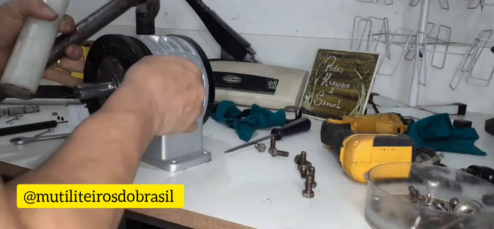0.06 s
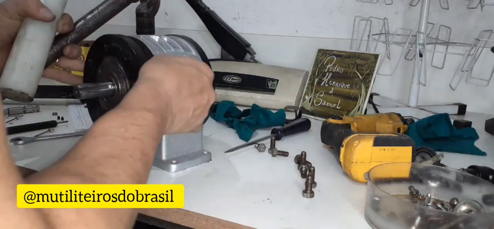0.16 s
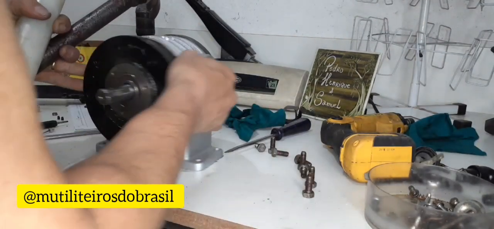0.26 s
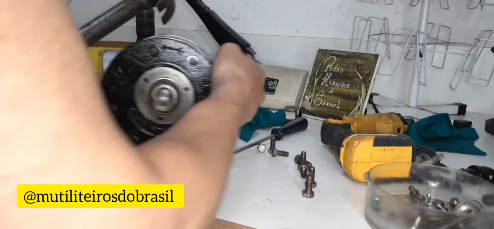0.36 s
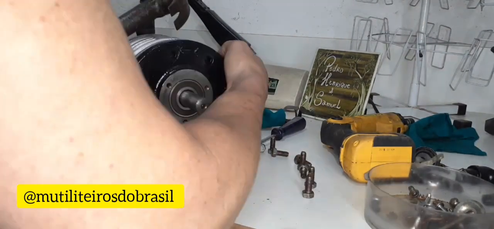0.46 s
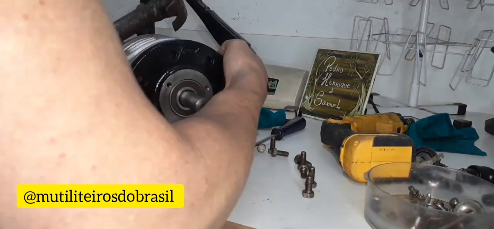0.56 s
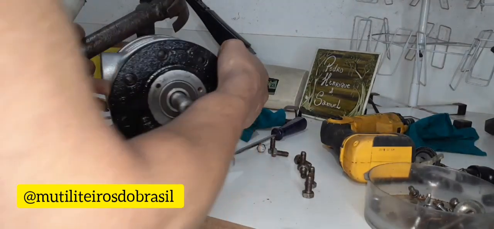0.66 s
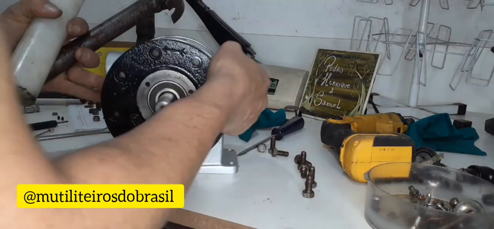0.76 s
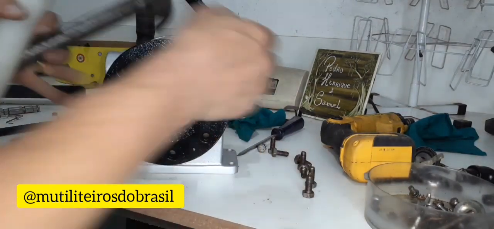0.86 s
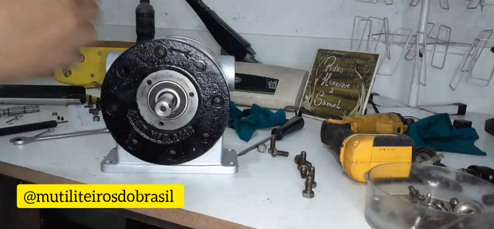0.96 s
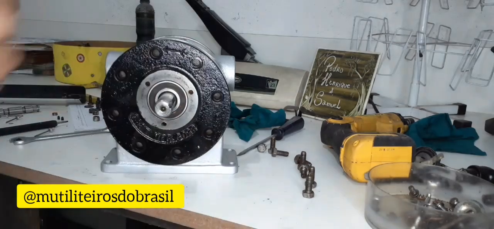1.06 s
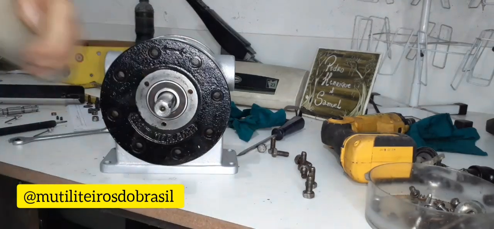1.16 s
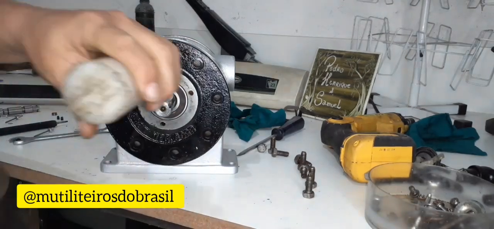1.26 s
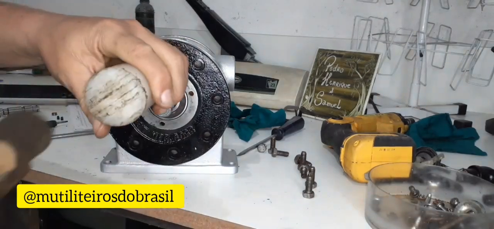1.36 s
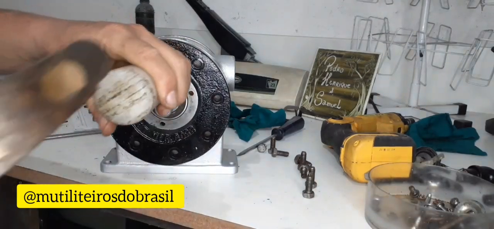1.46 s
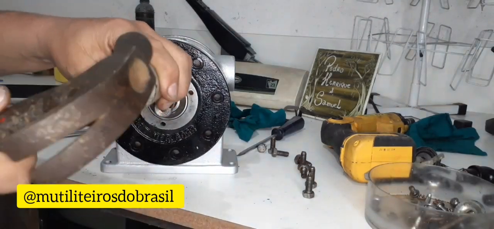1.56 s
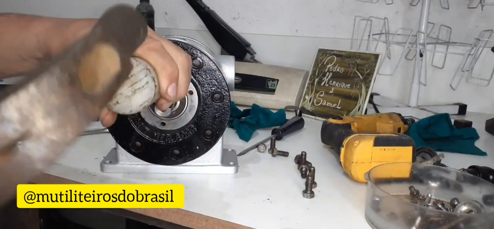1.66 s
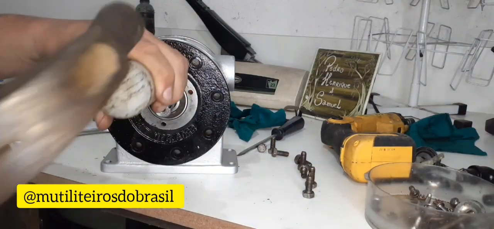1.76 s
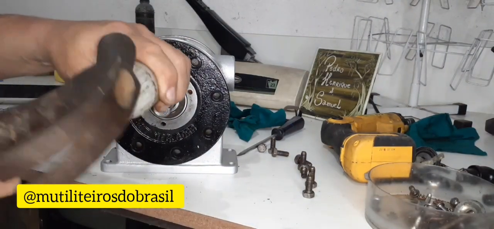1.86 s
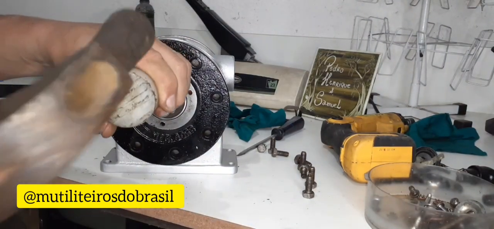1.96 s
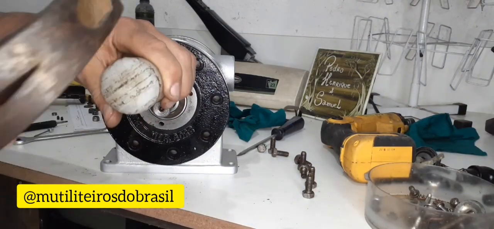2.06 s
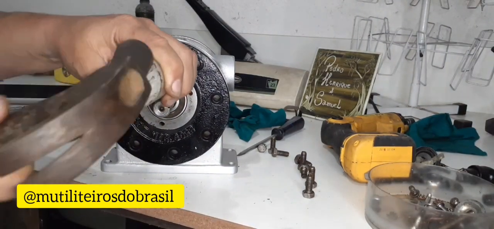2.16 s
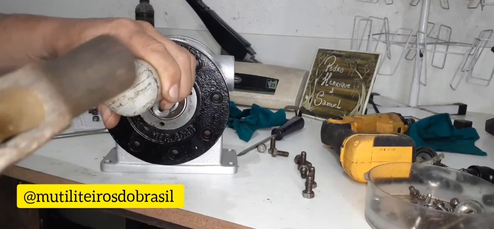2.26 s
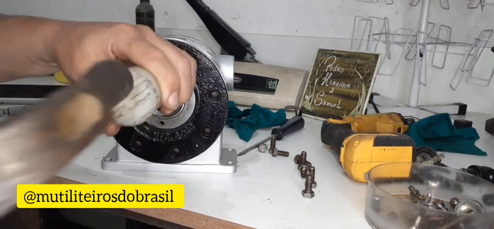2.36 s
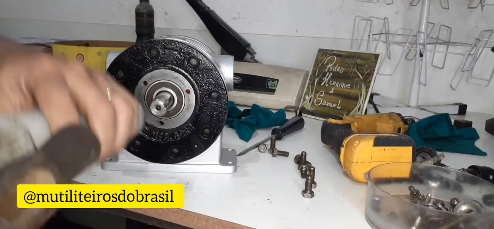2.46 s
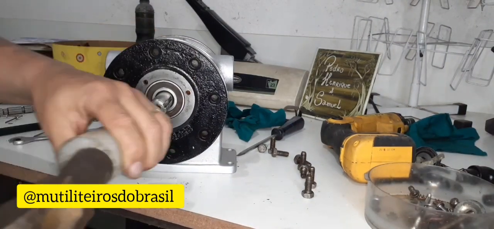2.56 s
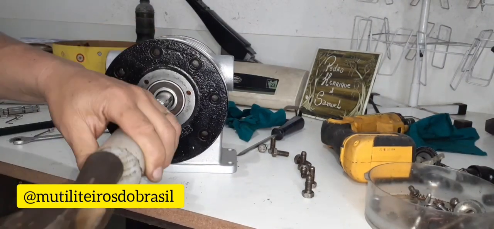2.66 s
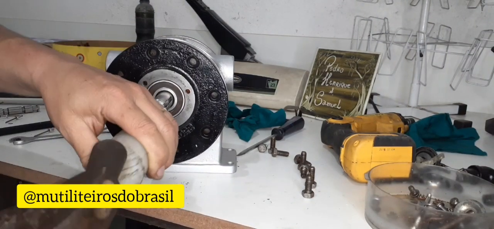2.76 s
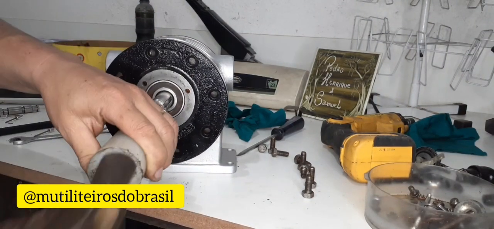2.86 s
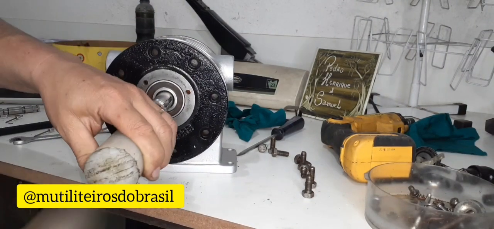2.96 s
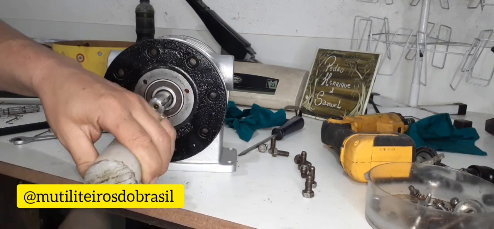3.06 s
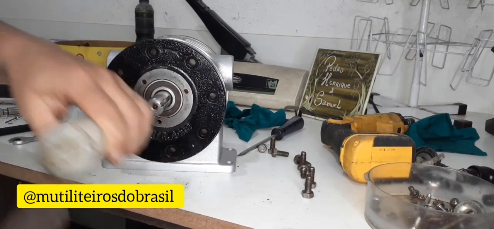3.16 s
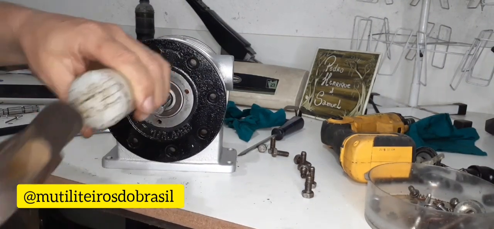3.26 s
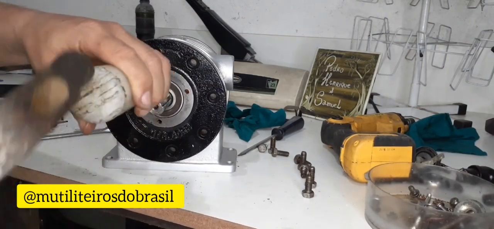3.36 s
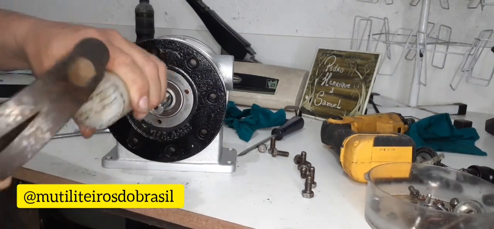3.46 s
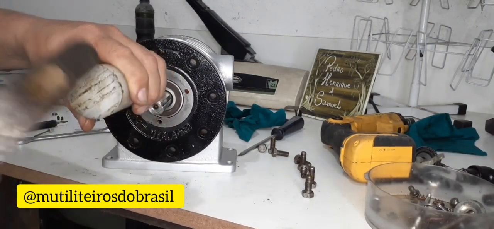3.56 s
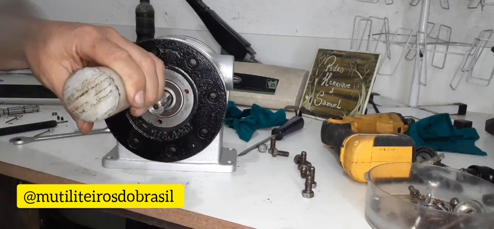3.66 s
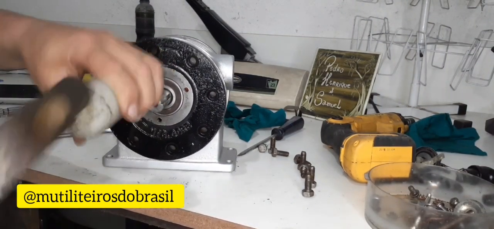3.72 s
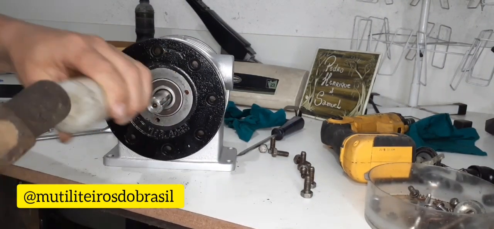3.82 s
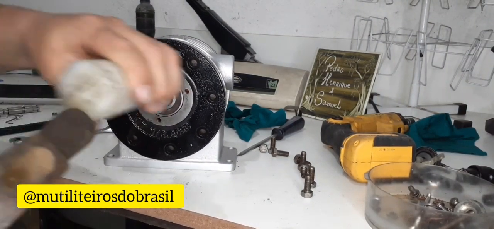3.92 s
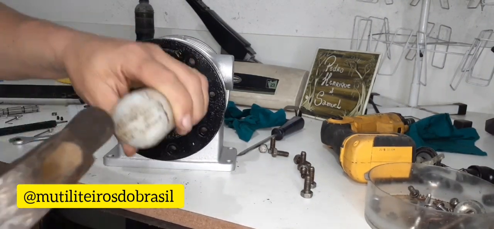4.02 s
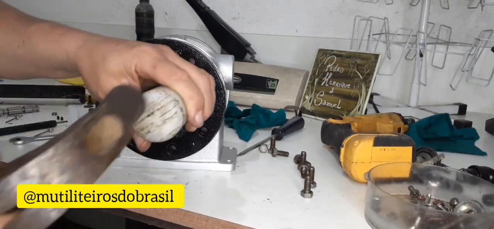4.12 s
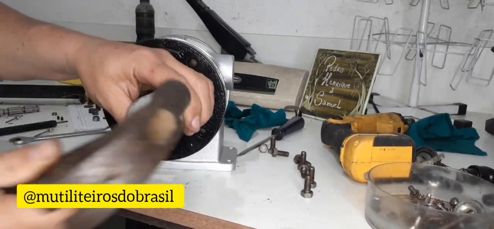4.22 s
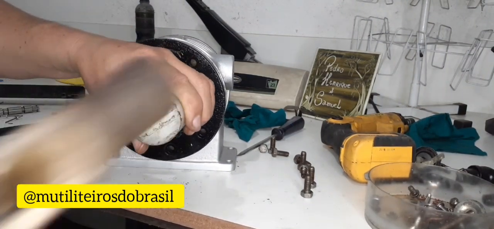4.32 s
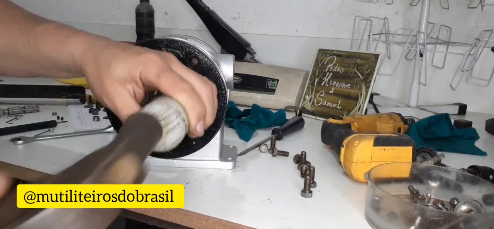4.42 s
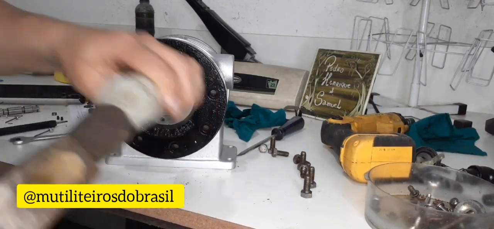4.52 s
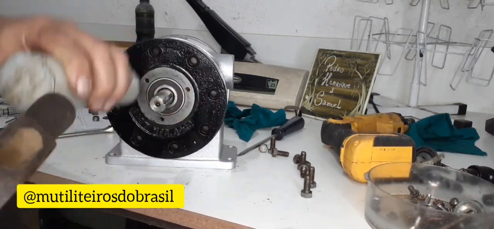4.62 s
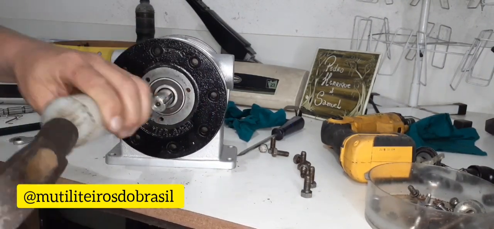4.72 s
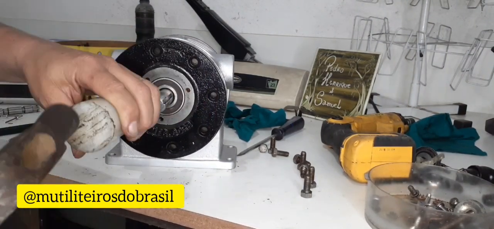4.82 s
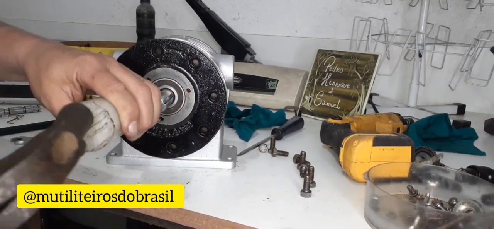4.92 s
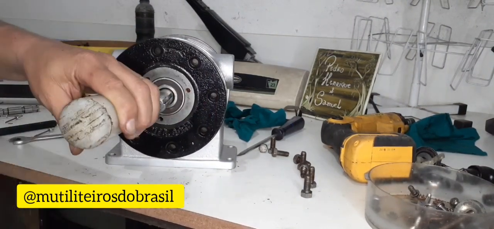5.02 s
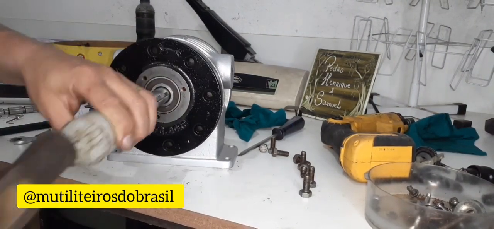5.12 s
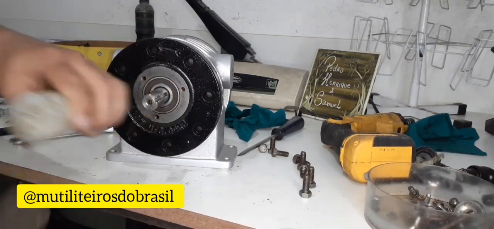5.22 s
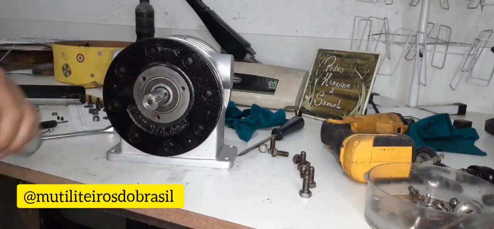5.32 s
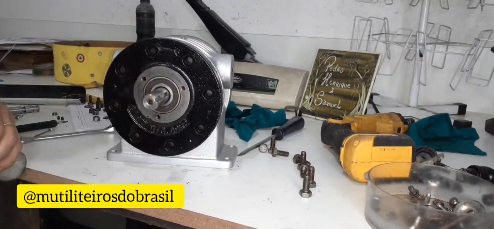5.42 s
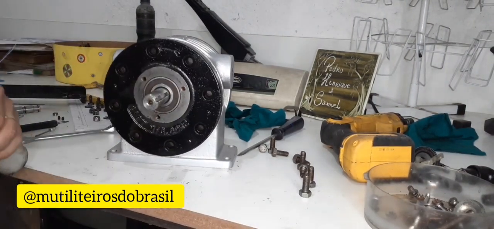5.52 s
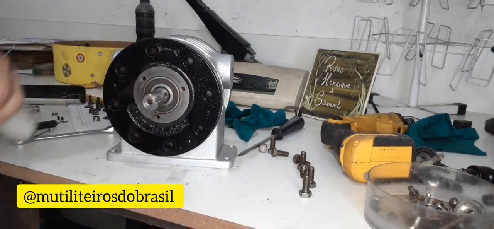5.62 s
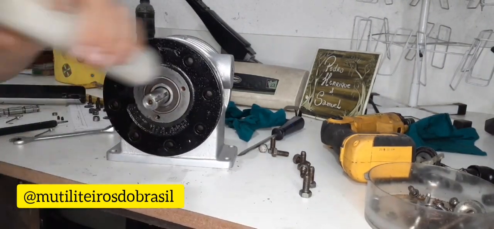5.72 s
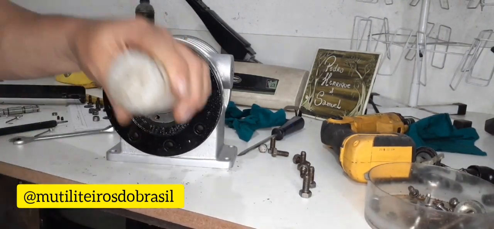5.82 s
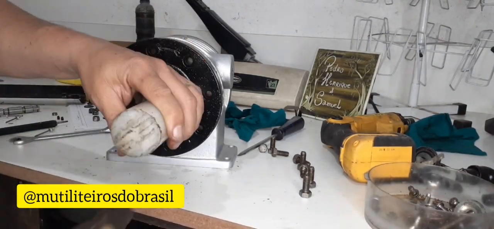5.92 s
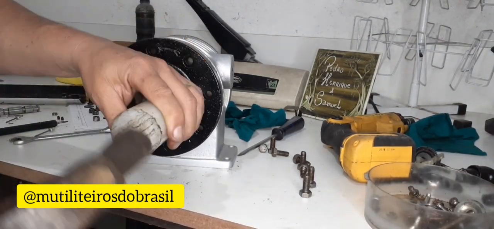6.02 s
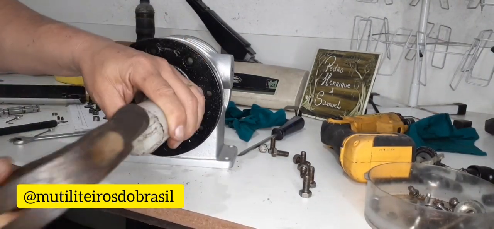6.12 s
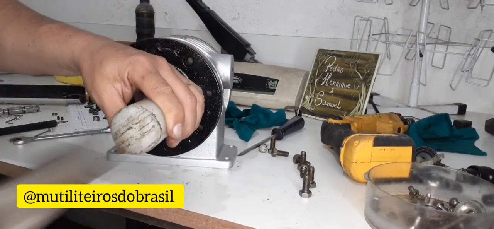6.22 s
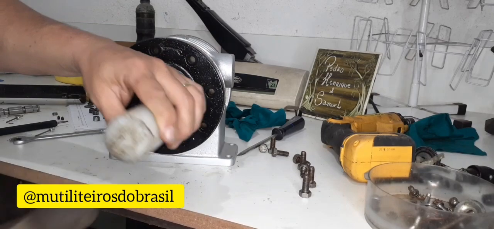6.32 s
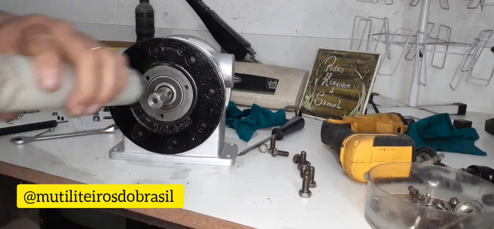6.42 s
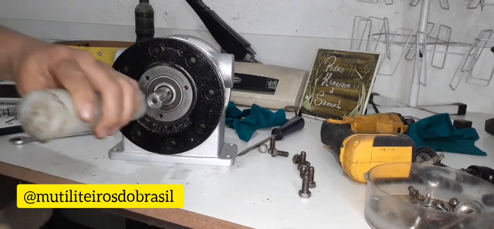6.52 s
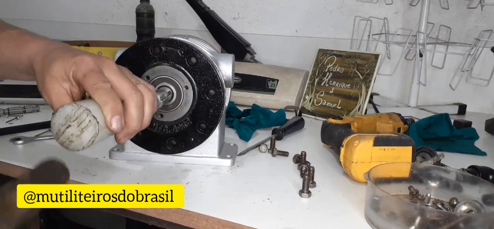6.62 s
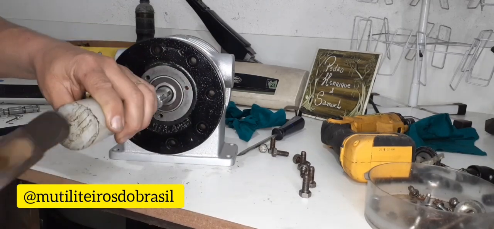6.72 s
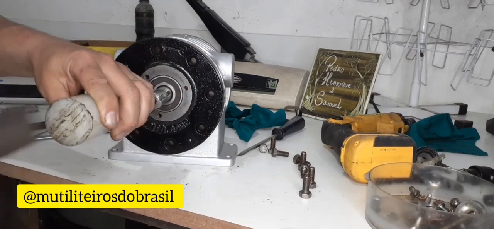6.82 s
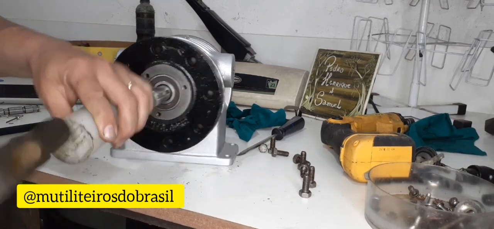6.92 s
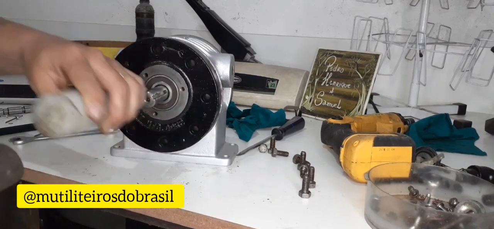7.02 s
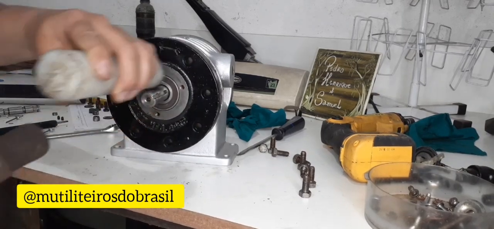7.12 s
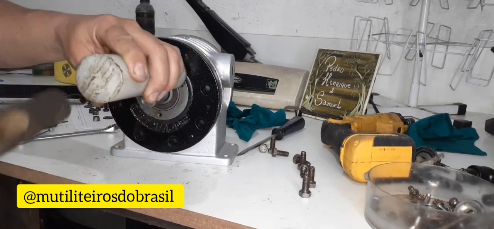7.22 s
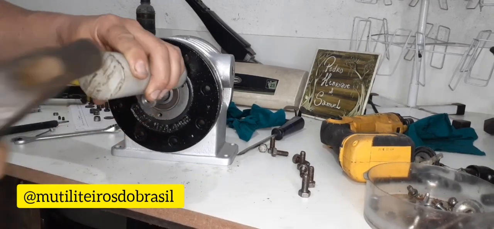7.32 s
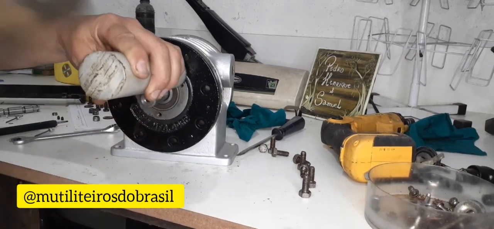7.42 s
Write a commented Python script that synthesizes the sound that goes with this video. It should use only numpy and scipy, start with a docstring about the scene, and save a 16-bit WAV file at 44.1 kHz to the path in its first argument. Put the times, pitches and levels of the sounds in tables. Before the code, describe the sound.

After a short scrape, uneven hammer taps and sharp blows drive a metal cover home, thudding through a bench in a small workshop.

```python
"""A hammer drives the metal end cover of a motor housing home through a plastic drift, on a workbench.
First the housing is dragged round, a hand brushes over it and a tool clinks. Then light aiming taps
alternate with hard blows; each cracks, rings the cover, thuds through the bench and shakes loose screws.
Two microphones stand close to the bench in a small, hard-walled workshop with a faint low drone."""
import sys
import numpy as np
from scipy import signal
from scipy.fft import rfft, irfft
from scipy.io import wavfile

SR = 44100
rng = np.random.default_rng(int(sys.argv[2]) if len(sys.argv) > 2 else 0)


def digitize_waveform(pressure):
    """Quantize a signal to 16-bit integers and store it at the path in sys.argv[1].

    Rows of a 2-D input are taken as channels; values are limited to [-1, 1].
    """
    field = np.atleast_2d(pressure).T
    bounded = np.clip(field, -1, 1)
    quanta = np.round(bounded * 32767).astype(np.int16)
    wavfile.write(sys.argv[1], SR, quanta)


N = 329868
SIZE, LEAD = 32768, 2048  # samples in one blow, and how many of them come before the contact
HZ = np.fft.rfftfreq(SIZE, 1 / SR)
T = (np.arange(SIZE) - LEAD) / SR  # seconds since the contact
USUAL_DB = -30  # body level of a usual blow; force is counted in dB above it


def gain_of(db):
    """Decibels to amplitude."""
    return 10 ** (np.asarray(db) / 20)


def unit_rms(x):
    """Scales to rms 1."""
    return x / np.sqrt(np.mean(x ** 2) + 1e-20)


def curve(points, hz=HZ):
    """Joins table rows by straight lines on a log-frequency axis."""
    row_hz, value = np.transpose(points)
    return np.interp(np.log(hz + 1), np.log(row_hz + 1), value)


def peak(hz, width_hz):
    """Bell of a resonance, 1 at its centre."""
    return 1 / (1 + (2 * (HZ - hz) / width_hz) ** 2)


def levelled(colour):
    """Refers a colour in dB to the power of its middle band."""
    middle = (HZ > 500) & (HZ < 2500)
    return colour - 10 * np.log10(np.mean(gain_of(colour) ** 2 * middle))


def coloured(x, db):
    """Filters x by a gain curve in dB, at minimum phase so that its peaks ring after the blow."""
    log_gain = np.log(gain_of(np.maximum(db, -100)))
    mirrored = np.r_[log_gain, log_gain[-2:0:-1]]
    response = np.exp(np.conj(signal.hilbert(mirrored)))[:len(HZ)]
    return signal.fftconvolve(x, irfft(response)[None, :SIZE // 2], axes=1)[:, :x.shape[1]]


def resonating(x, hz, width_hz):
    """One resonance driven by x, at rms 1."""
    return unit_rms(coloured(x, 20 * np.log10(peak(hz, width_hz))))


def paired(x):
    """Makes two unrelated channels alike in the bass, as at two close microphones."""
    # Each row: frequency in Hz, correlation of left and right.
    likeness = [(30, .35), (80, .88), (200, .9), (330, .8), (550, .5), (1000, .02), (3000, -.1), (16000, 0)]
    a, b = rfft(x)
    same = curve(likeness, np.fft.rfftfreq(x.shape[1], 1 / SR))
    mid, side = a * np.sqrt((1 + same) / 2), b * np.sqrt((1 - same) / 2)
    return irfft([mid + side, mid - side], x.shape[1])


def grains(size, per_s, spread_db):
    """Two channels of random clicks of uneven strength."""
    strength = gain_of(spread_db * np.minimum(rng.exponential(1, (2, size)), 4))
    return unit_rms(strength * rng.choice([-1, 1], (2, size)) * (rng.random((2, size)) < per_s / SR))


def wander(step_s):
    """Random drift that takes a new value every step_s seconds."""
    return np.interp(np.arange(N) / SR / step_s, np.arange(2048), rng.standard_normal(2048))


def arch(start, length, late):
    """Rises from 0 to 1 and falls back; the greater late is, the later the top."""
    progress = np.clip((np.arange(N) / SR - start) / length, 0, 1)
    return np.abs(np.sin(np.pi * progress ** late))


def rise(swell):
    """Onset that swells over the given seconds up to the contact."""
    return np.clip(1 + T / max(swell, 1e-4), 0, 1) ** 2


def lingering(level, db_per_s):
    """Lets a level fall no faster than bench and room die away."""
    fall = np.arange(N) / SR * db_per_s
    return gain_of(np.maximum.accumulate(20 * np.log10(level + 1e-9) + fall) - fall)


def add(mix, s, sound):
    """Mixes in a stereo sound whose contact falls at s seconds."""
    part = mix[:, round(s * SR) - LEAD:][:, :SIZE]
    part += sound[:, :part.shape[1]]


def room_tone(drone_db=-77.5, waver_db=2.5, hiss_db=-91.5):
    """The quiet workshop: a low drone that slowly wavers, and microphone hiss."""
    # Each row: frequency in Hz, the drone's spectral density in dB.
    spectrum = [(20, -14.5), (60, -9.5), (105, -3), (150, -10), (188, -1.5), (250, -11.5), (450, -17.5),
                (900, -26), (2000, -35), (6500, -50.5), (15000, -43)]
    drone = unit_rms(coloured(paired(rng.standard_normal((2, N))), curve(spectrum)))
    level = gain_of(drone_db + waver_db * wander(step_s=.3))
    return level * drone + gain_of(hiss_db) * rng.standard_normal((2, N))


def dragging(split_hz=800, catch_db=0.9, rumble_db=0.5):
    """Tiny slips of the housing's foot hiss on the bench top and set the board rumbling and juddering."""
    # Each row: start and length in seconds, friction in dB, how late the speed peaks, judder in dB.
    shoves = [(0.169, 0.34, -38.5, 1.56, -43), (0.584, 0.2, -44.5, 2.28, -58)]
    # Each row: frequency in Hz, the scrape's spectral density in dB.
    spectrum = [(24, -65), (40, -25), (86, -9.5), (206, -5.5), (251, 3.5), (373, -5.5), (443, -0.5),
                (490, -4.5), (541, -4), (888, -10), (2220, -11.5), (7490, -33.5), (9130, -29), (15000, -41)]
    friction, shake = np.zeros((2, N))
    for start, length, level_db, late, judder_db in shoves:
        speed = arch(start, length, late)
        friction += gain_of(level_db) * speed ** 0.78
        shake += gain_of(judder_db) * speed ** 9.8  # only near full speed
    friction *= gain_of(catch_db * wander(step_s=.02))  # the foot catches and slips
    slips = paired(grains(N, per_s=5000, spread_db=3.0))
    colour, steep = curve(spectrum), (HZ / split_hz) ** 6
    hiss = unit_rms(coloured(slips, colour + 10 * np.log10(steep / (1 + steep) + 1e-9)))
    hiss *= lingering(friction, db_per_s=302)
    rumble = unit_rms(coloured(slips, colour - 10 * np.log10(1 + steep)))
    rumble *= gain_of(rumble_db) * lingering(friction, db_per_s=206)
    return hiss + rumble + shake * resonating(slips, hz=92, width_hz=50)


def brushing(stick_db=3):
    """A hand lets go of the housing in a few light strokes, its skin sticking and slipping."""
    # Each row: middle of the stroke in seconds, half length in seconds, level in dB.
    strokes = [(0.814, 0.056, -76), (0.992, 0.014, -69), (1.04, 0.022, -63), (1.116, 0.031, -63.5),
               (1.273, 0.059, -71.5), (1.37, .005, -74)]
    # Each row: frequency in Hz, spectral density of skin on the casting in dB.
    spectrum = [(20, -45), (250, -25), (420, -3), (800, -5.5), (2200, -7.5), (4000, -11), (7400, -9),
                (9500, -1), (16000, -15)]
    t = np.arange(N) / SR
    level = sum(gain_of(db) * np.exp(-.5 * ((t - s) / half) ** 2) for s, half, db in strokes)
    level *= gain_of(stick_db * wander(step_s=.011))
    slips = paired(grains(N, per_s=4100, spread_db=1.5))
    return lingering(level, db_per_s=450) * unit_rms(coloured(slips, curve(spectrum)))


def clink(at_s=1.068, swell_s=.035, level_db=-63.5):
    """A tool rings faintly as it is picked up."""
    # Each row: frequency of a mode in Hz, relative level in dB, seconds to fall 60 dB.
    modes = [(1050, -2, .25), (1728, 1, .14), (2557, -6, .24), (3521, -12, .18)]
    out = np.zeros((2, N))
    for hz, db, t60 in modes:
        tone = np.sin(2 * np.pi * hz * T + rng.uniform(-1.2, 1, (2, 1)))
        fade = gain_of(level_db + db - 60 * np.maximum(T, 0) / t60)
        add(out, at_s, rise(swell_s) * tone * fade)
    return out


def crack(swell, contact_s=0.0054, smear=0.52):
    """Direct sound of a contact: a short burst, longer when the onset is soft."""
    shape = rise(swell) * np.exp(-(np.maximum(T, 0) / (contact_s + smear * swell)) ** 2)
    return paired(rng.choice([-1., 1.], (2, SIZE))) * shape


def reverberation(swell, hold_s=.033, build_s=.008):
    """Dense reflections build up, hold briefly and die band by band."""
    # Each row: frequency in Hz, seconds for bench and workshop to fall 60 dB.
    decay = [(80, 0.53), (200, 0.31), (560, 0.27), (1500, 0.26), (3900, 0.24), (10000, 0.19), (16000, 0.26)]
    reflections = paired(grains(SIZE, per_s=9700, spread_db=3.0))
    hz, t, bands = signal.stft(reflections, SR, nperseg=256)
    age = np.hypot(np.maximum(t - LEAD / SR, 0), hold_s) - hold_s
    fade = gain_of(-60 * age / curve(decay, hz)[:, None])
    dying = signal.istft(bands * fade, SR, nperseg=256)[1][:, :SIZE]
    return dying * rise(swell) * (1 - np.exp(-np.maximum(T + swell, 0) / build_s))


def drift_nudges(room_db=-7.0):
    """The plastic drift is set against the cover: soft knocks, each with a short answer from the room."""
    # Each row: time in seconds, swell in seconds, level in dB, bass lift in dB.
    touches = [(1.408, 0.0028, -62.5, 14.5), (1.5, .0066, -64, 20.5), (4.122, 0.0084, -64, 15),
               (4.776, 0.0083, -71.5, 14.5), (5.893, .008, -58.5, 5.5), (5.937, .015, -47, -2.5),
               (6.628, 0.0081, -53, 2.5), (6.652, 0.014, -72, 20.5)]
    # Each row: frequency in Hz, spectral density of the dull knock in dB.
    spectrum = [(20, -21.5), (100, -0.5), (200, -3.5), (330, -8), (470, 3), (630, -7), (790, -4.5),
                (1100, -11.5), (1450, -20), (2200, -22.5), (3000, -39.5), (4200, -31), (7000, -47),
                (9500, -34), (16000, -55)]
    out = np.zeros((2, N))
    for s, swell, level_db, bass_db in touches:
        # a glancing touch has less of the drift's hollow middle, so its treble rises with its bass
        treble_db = -13.5 + 1.02 * bass_db
        tilt = curve([(200, bass_db), (470, 0), (1000, 0), (2200, treble_db)])
        touch = crack(swell) + gain_of(room_db) * reverberation(swell, hold_s=0.041, build_s=0.0013)
        add(out, s, gain_of(level_db) * coloured(touch, levelled(curve(spectrum) + tilt)))
    return out


def strike_ripple(ripple_db=2.5, spacing_hz=80):
    """Each blow lands on another spot and favours other overtones: a random curve in dB."""
    knots = np.arange(len(HZ)) * spacing_hz
    return ripple_db * np.interp(HZ, knots, rng.standard_normal(len(knots))) * np.clip(HZ / 2000, 0, 1)


def housing_colour(swell, force_db, bright_db, spot_hz, ring):
    """Spectrum in dB of housing and bench under one blow; ring scales their resonances."""
    # Each row: frequency in Hz, spectral density of housing and bench in dB.
    body = [(20, -30), (50, -14), (100, -7.5), (260, 0.5), (450, -2), (850, -1), (1500, -4), (2500, -7.5),
            (4200, -10.5), (6500, -21.5), (7600, -30.5), (9300, -21), (11300, -32.5), (16000, -43)]
    # Each row: a resonance of bench, cover or shaft in Hz, width in Hz, lift in dB.
    modes = [(104, 26, 6), (187, 20, 4), (258, 25, 1.5), (326, 42, 4), (797, 32, 7.5), (1086, 22, 3.5),
             (1680, 170, 3.5), (1798, 200, 6), (2183, 170, 6.5), (2470, 35, 5.5), (3204, 14, 6),
             (3330, 45, -3), (3600, 19, 4.5), (4190, 120, 5), (5030, 230, 4), (6380, 300, 5),
             (8900, 80, 0.5), (9900, 62, 5.5), (10703, 35, 7.5)]
    # Each row: frequency in Hz, gain for a usual blow in dB.
    usual_tone = [(300, 0), (700, -0.5), (1100, -0.5), (2200, -6), (4000, -8.5), (6000, -9), (9000, -10.5)]
    # Each row: frequency in Hz, dB gained per dB of brightness.
    opening = [(1100, 0), (2200, 0.606), (4000, 1), (9000, 1.4858)]
    lifts = ring * sum(db * peak(hz, width) for hz, width, db in modes)
    spot_db = 9 - .08 * force_db  # a hard blow presses the drift on and damps the favoured overtone
    lifts += (spot_db - lifts) * peak(spot_hz, width_hz=.05 * spot_hz)
    bass_db = 90 * swell - 0.3129 * force_db  # blows that swell in softly have more bass, hard ones less
    tilt = curve(usual_tone) + bright_db * curve(opening) + curve([(300, bass_db), (700, 0)])
    return levelled(curve(body) + lifts + tilt + strike_ripple())


def thunk(hz=830, length_s=.0095, right_phase=0.5):
    """The drift is squeezed by the blow and springs back for a few cycles."""
    t = np.clip(T, 0, length_s)
    swing = np.sin(np.pi * np.sqrt(t / length_s)) ** 2
    phase = 2 * np.pi * hz * rng.uniform(0.92, 1.0) * t
    return swing * np.sin(phase + right_phase * np.arange(2)[:, None])


def knock(swell, crack_db, body_db, hardness_db, spot_hz, ring):
    """One hammer blow: crack, first echoes and reverberation all carry the housing's resonances."""
    # Each row: delay in seconds and level in dB of an echo from bench top or wall.
    first_echoes = [(.009, -15.5), (.0185, -14), (.026, -19.5)]
    force_db = body_db - USUAL_DB
    bright_db = hardness_db + 0.4947 * force_db  # harder blows shorten the contact
    colour = housing_colour(swell, force_db, bright_db, spot_hz, ring)
    # the heavy bench is slow to move, so the crack has little bass
    lean = curve([(100, -16.5), (450, -11.5), (800, 0.5), (1300, -0.5), (4000, -3.5), (10000, 3.5)])
    treble_db = -4.5 + .65 * bright_db
    burst = crack(swell)
    direct = coloured(burst, colour + lean + curve([(900, 0), (2500, treble_db)]))
    direct *= np.linalg.norm(burst) / np.linalg.norm(direct)
    # the duller the contact, the more of it is the drift's thunk
    direct = gain_of(crack_db) * (direct + gain_of(-7.5 - treble_db) * thunk())
    echoes = sum(gain_of(db) * np.roll(direct[::-1], round(s * SR), axis=1) for s, db in first_echoes)
    return direct + echoes + gain_of(body_db) * coloured(reverberation(swell), colour)


def screws(force_db, loudest_db=-52, peak_s=.055, spread_s=.036):
    """Loose screws hop and chatter on the bench top for a moment after a blow."""
    # Each row: frequency in Hz, the chatter's spectral density in dB.
    spectrum = [(20, -70.5), (3000, -24), (5500, -5), (7600, -6), (9200, 1), (11500, -5.5), (16000, -9)]
    level_db = min(-55 + .7 * force_db, loudest_db)
    shape = np.exp(-.5 * ((T - peak_s) / spread_s) ** 2) * np.clip(T / .01, 0, 1)
    hops = grains(SIZE, per_s=5000, spread_db=1.2)
    chatter = unit_rms(coloured(hops, curve(spectrum) + strike_ripple(ripple_db=2.0, spacing_hz=140)))
    return gain_of(level_db) * chatter * shape


def room_boom(body_db, below_db=31.5, t60=0.89):
    """A low mode of the workshop lingers after each blow."""
    ringing = resonating(paired(rng.standard_normal((2, SIZE))), hz=190, width_hz=55)
    fade = gain_of(body_db - below_db - 60 * np.maximum(T, 0) / t60)
    return fade * ringing * np.clip(T / .03, 0, 1)


def hammering(ring_loose=1.2, ring_seated=.75, seating_s=1.1):
    """Taps and blows drive the cover home: it rings freely while loose and is damped as it seats."""
    # Each row: time and swell in seconds, crack, body and contact hardness in dB,
    # and the overtone in Hz that the struck spot favours.
    blows = [(1.543, 0.014, -26, -33.5, -2.5, 2170), (1.68, 0.0031, -9.5, -21.5, -2.5, 800),
             (1.83, 0.00052, -5.5, -22.5, -1, 2170), (1.985, 0.0024, -26, -42, 4.5, 4090),
             (1.996, 0.0025, -26, -58.5, 14.5, 4090), (2.172, 0.015, -24, -30, 2.5, 1680),
             (2.317, 0.03, -24, -20, 1, 800), (2.745, 0.0005, -40.5, -45.5, 2.5, 4090),
             (2.896, 0.027, -34, -38, 5, 3620), (3.035, 0.02, -18, -24.5, 12, 3570),
             (3.453, 0.02, -49, -52, 4, 3510), (3.594, 0.026, -30.5, -36.5, 4, 2200),
             (3.722, 0.0024, -18, -17, -0.5, 3210), (4.238, 0.021, -42, -36.5, 3, 3140),
             (4.385, 0.0021, -9.5, -16.5, 1, 3250), (4.91, 0.0011, -26.5, -37.5, 2, 2200),
             (5.071, 0.0028, -15, -17, -0.5, 4180), (6.103, 0.0025, -20.5, -32.5, 3.5, 4130),
             (6.264, 0.022, -16.5, -21, 4.5, 2200), (6.773, 0.026, -34.5, -36.5, 5, 3530),
             (6.91, 0.0027, -10.5, -16, -0.5, 1720), (7.355, 0.00088, -20.5, -30.5, 0, 750)]
    first_s = blows[0][0]
    out = np.zeros((2, N))
    for s, swell, crack_db, body_db, hardness_db, spot_hz in blows:
        ring = ring_seated + (ring_loose - ring_seated) * np.exp((first_s - s) / seating_s)
        blow = knock(swell, crack_db, body_db, hardness_db, spot_hz, ring)
        add(out, s, blow + screws(body_db - USUAL_DB) + room_boom(body_db))
    return out


def hum(start_s=5.55, length_s=0.41, level_db=-66):
    """A low hum swells once and stops."""
    tone = resonating(paired(rng.standard_normal((2, N))), hz=108.7, width_hz=12.2)
    return gain_of(level_db) * arch(start_s, length_s, late=1.7) * tone


def scene():
    """Everything that reaches the microphones at the bench."""
    return hammering() + drift_nudges() + dragging() + brushing() + clink() + room_tone() + hum()


def record(dry, edge_hz=16100):
    """The recorder rounds off the hardest cracks at full scale and cuts the highest treble."""
    lowpass = signal.firwin(511, edge_hz, window=("kaiser", 9), fs=SR)
    return signal.oaconvolve(np.tanh(dry), lowpass[None], "same")


dry = scene()
out = record(dry)
digitize_waveform(out)
```